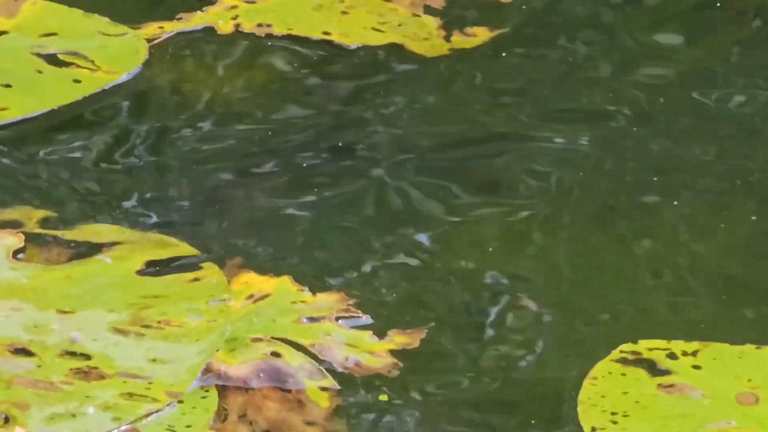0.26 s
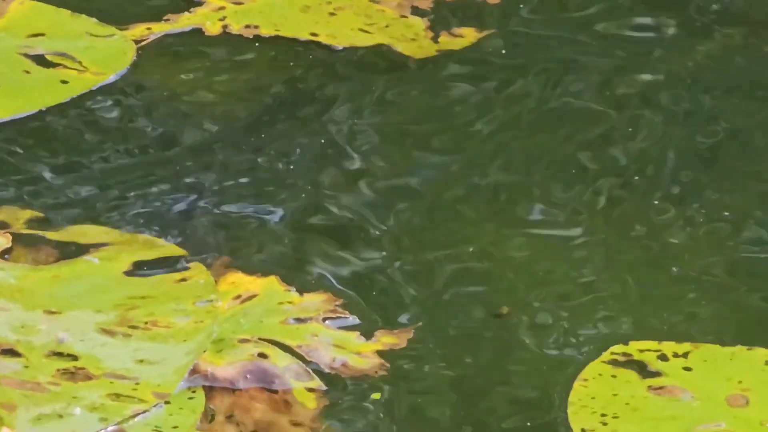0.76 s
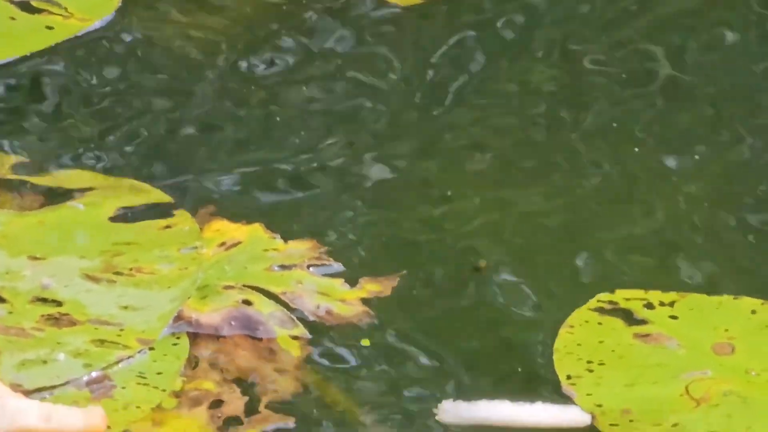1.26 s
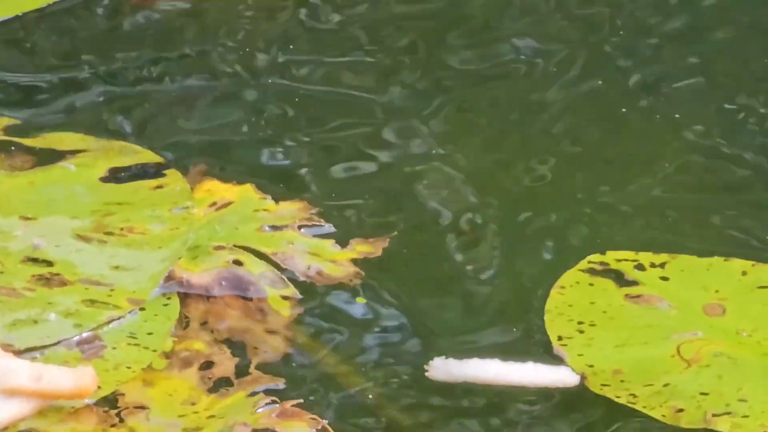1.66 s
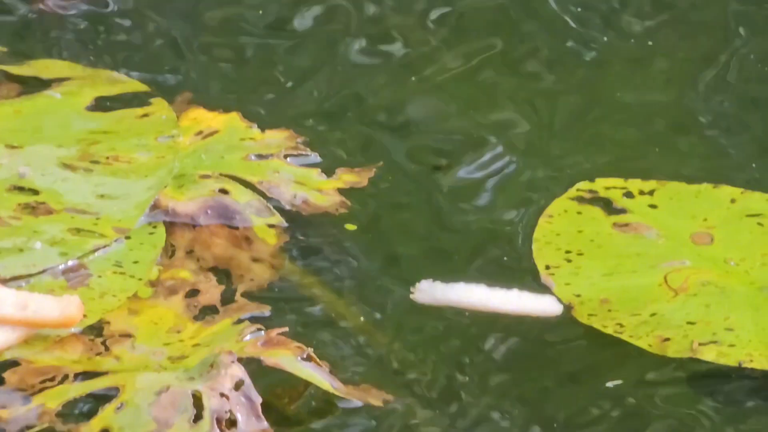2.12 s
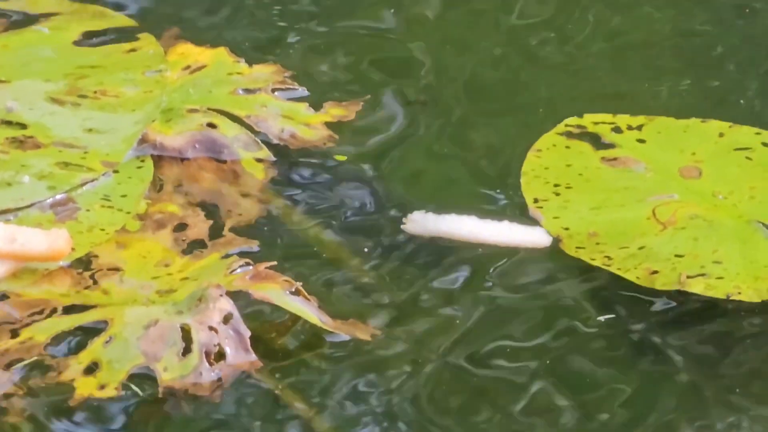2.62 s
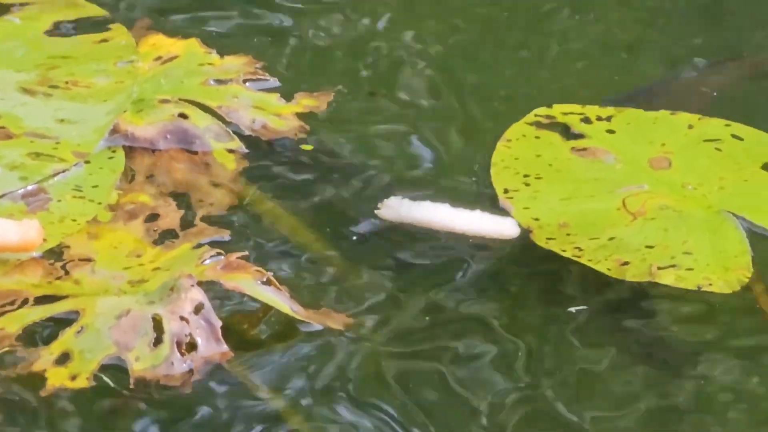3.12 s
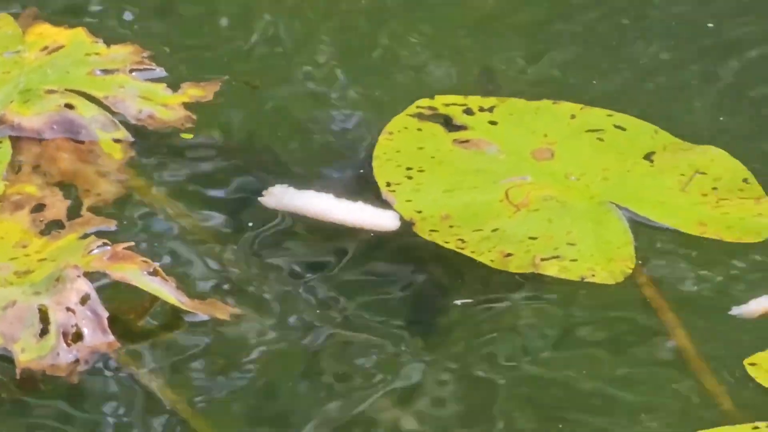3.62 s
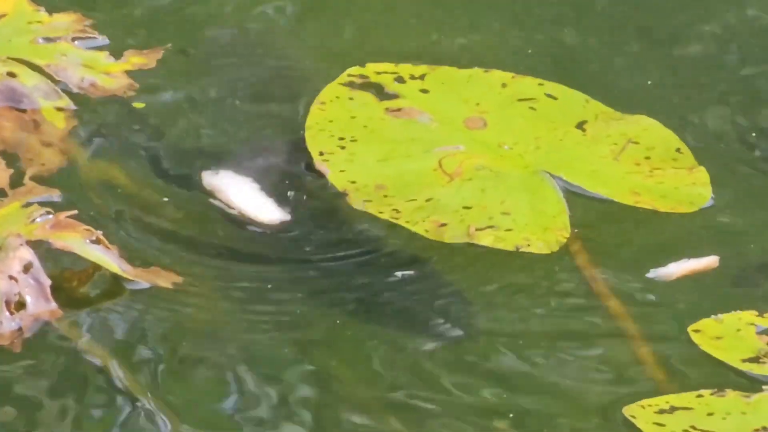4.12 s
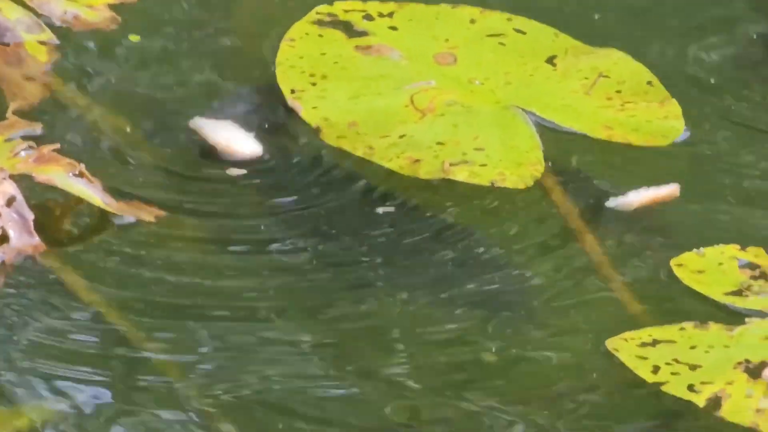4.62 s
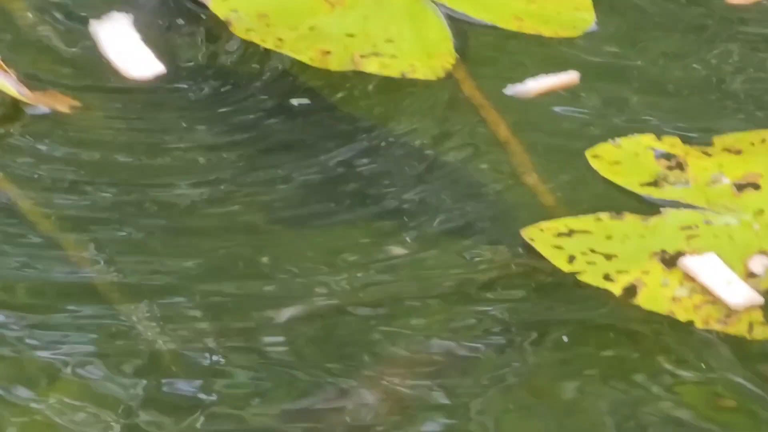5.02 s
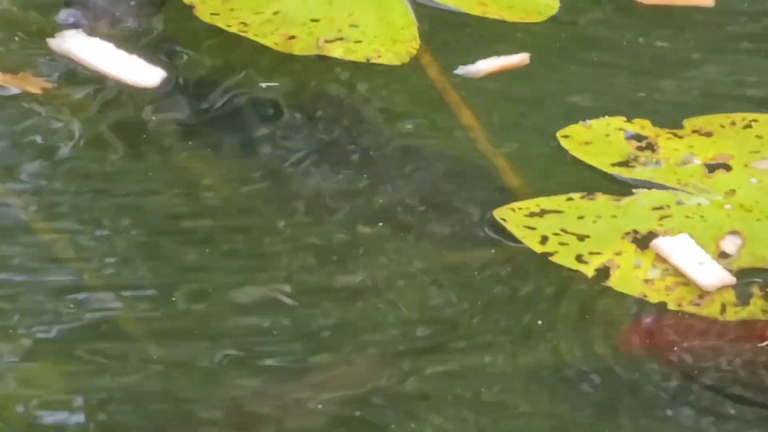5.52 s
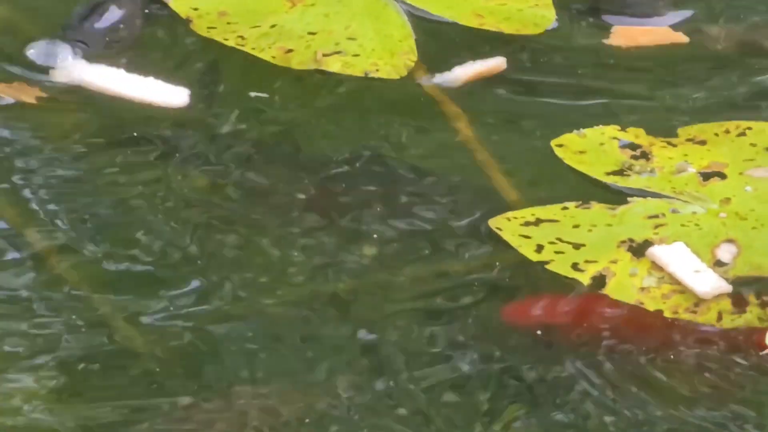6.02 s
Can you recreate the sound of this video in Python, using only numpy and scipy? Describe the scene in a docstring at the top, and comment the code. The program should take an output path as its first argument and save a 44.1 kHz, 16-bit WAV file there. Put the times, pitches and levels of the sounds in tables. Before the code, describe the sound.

Close to a pond surface, fish mouths take floating bread with tiny wet smacks, sharp pops and low plops. They start sparse and grow more frequent. A nearby bird gives short upward chirps in the middle, a small stiff knock sounds once with a quick echo, and faint hoarse twittering arrives at the end. Distant traffic rumble and soft leaf hiss lie beneath. Close stereo microphone outdoors, light garden echoes.

```python
"""A soft outdoor hiss over distant traffic rumble opens the scene: shaped noise with drifting patches.
Pond fish then suck floating bread from the surface: wet noise smacks, short sine rings (low plops and
high resonances) and small ticks. A two-voiced bird chirps upward nearby, grainy whistles twitter far
off, and a struck-mode knock sounds once. Scattered garden echoes answer them, and two microphone
ports hear the close sounds with a phase lag."""
import sys
import numpy as np
from scipy import signal
from scipy.fft import rfft, irfft, next_fast_len
from scipy.io import wavfile
from scipy.ndimage import uniform_filter1d

SR = 44100
rng = np.random.default_rng(int(sys.argv[2]) if len(sys.argv) > 2 else 0)


def digitize_waveform(pressure):
    """Quantize a signal to 16-bit integers and store it at the path in sys.argv[1].

    Rows of a 2-D input are taken as channels; values are limited to [-1, 1].
    """
    field = np.atleast_2d(pressure).T
    bounded = np.clip(field, -1, 1)
    quanta = np.round(bounded * 32767).astype(np.int16)
    wavfile.write(sys.argv[1], SR, quanta)


N = 276507  # length in samples


def amp(db):
    """Decibels to gain."""
    return 10 ** (np.asarray(db) / 20)


def evened(x):
    """Scales to rms 1."""
    return x / np.sqrt(np.mean(x ** 2) + 1e-20)


def read(points, hz):
    """Reads a curve on a log-frequency axis."""
    f, value = np.transpose(points)
    return np.interp(np.log(hz + 1), np.log(f + 1), value)


def add(mix, start_s, sound, pan_db):
    """Places a mono sound in both channels; positive pan_db leans left."""
    part = mix[:, round(start_s * SR):][:, :len(sound)]
    part += sound[:part.shape[1]] * amp([[pan_db / 2], [-pan_db / 2]])


def band(x, low_hz, high_hz):
    """Causal band-pass."""
    sos = signal.butter(2, [low_hz, high_hz], "bandpass", fs=SR, output="sos")
    return signal.sosfilt(sos, x)


def ring(hz, t60_s, rise_s, octaves=0.):
    """A decaying sine with a soft start; it glides by octaves per 20 ms during its first 30 ms."""
    t = np.arange(round(min(t60_s, .1) * SR)) / SR
    pitch_hz = hz * 2 ** (octaves * np.minimum(t, .03) / .02)
    swell = (1 - np.exp(-t / rise_s)) ** 2
    return swell * amp(-60 * t / t60_s) * np.sin(2 * np.pi * np.cumsum(pitch_hz) / SR)


def grainy(size, rough):
    """A slow random factor that breaks a whistle into grains."""
    grains = evened(uniform_filter1d(rng.standard_normal(size), 45))
    return 1 - rough + rough * grains


# how alike the two background channels are: pitch_hz [Hz], likeness [-1 to 1]
LIKENESS = [(30, 0.69), (60, 1), (130, 0.83), (290, 0.32), (640, 0.45), (1410, 0.059), (3100, -0.031),
            (6820, -0.058), (15000, 0.064)]
# left-right balance of the background: pitch_hz [Hz], left_right_db [dB]
BED_LEAN = [(60, 0.5), (110, 0.0), (200, 1), (380, 2), (700, 1), (1290, 3), (2380, 2), (4400, 3), (8120, 5),
            (15000, 2)]


def bed(spectrum, level, patchy_db, size):
    """Stereo noise built from random spectra with drifting loud patches, following a level curve."""
    frames, hz = 4 * N // size + 5, np.fft.rfftfreq(size, 1 / SR)
    a, b, c, d, patches = rng.standard_normal((frames, len(hz), 5)).T
    patches = evened(uniform_filter1d(uniform_filter1d(patches, 9, 0), 9, 1))
    same = np.clip(read(LIKENESS, hz), -1, 1)[:, None]
    lean = amp(read(BED_LEAN, hz)[:, None] / 2)
    left = a + 1j * b
    right = same * left + np.sqrt(1 - same ** 2) * (c + 1j * d)
    z = np.array([left * lean, right / lean])
    z *= amp(read(spectrum, hz)[:, None] + patchy_db * patches)
    noise = signal.istft(z, nperseg=size, noverlap=3 * size // 4)[1][:, :N]
    noise /= np.sqrt(np.mean(noise.mean(0) ** 2))  # rms 1 in the middle
    return noise * amp(np.interp(np.arange(N) / SR, *level))


# level of the rumble before it throbs: time_s [s], level_db [dB]
RUMBLE_LEVEL = [(0, -52), (.7, -47), (1.2, -50), (2.5, -50), (3.5, -49), (4.1, -51), (4.4, -48.5),
                (5.2, -46.5), (5.9, -50), (6.27, -45.5)]
# colour of the rumble: pitch_hz [Hz], relative density_db [dB per Hz]
RUMBLE_COLOUR = [(8.8, -63), (15, -27), (48, 0.5), (65, 3), (111, -4.5), (177, -24.5), (300, -26),
                 (390, -52), (660, -120)]
THROB_DB, THROB_S = 2, 0.078  # rms depth; smoothing length


def rumble():
    """Traffic rumble: low noise whose level throbs at random."""
    width = round(THROB_S * SR)
    throb = evened(uniform_filter1d(uniform_filter1d(rng.standard_normal(N), width), width))
    return bed(RUMBLE_COLOUR, np.transpose(RUMBLE_LEVEL), 0.086, size=4096) * amp(THROB_DB * throb)


# level of the far roads: time_s [s], level_db [dB]
ROAD_LEVEL = [(0.0, -58), (0.7, -58), (2.2, -60), (3.04, -59), (3.7, -60), (5.95, -60), (6.27, -57.5)]
# colour of the far roads: pitch_hz [Hz], relative density_db [dB per Hz]
ROAD_COLOUR = [(88, -33.5), (150, 9.5), (172, -12), (274, -12.5), (305, -30), (325, -14), (385, -17.5),
               (557, -15.5), (794, -10.5), (1130, -10), (1890, -14.5), (2650, -27), (6000, -39.5),
               (7800, -63), (13200, -120)]


def roads():
    """The wash of far roads: patchy noise weighted to the lower middle."""
    return bed(ROAD_COLOUR, np.transpose(ROAD_LEVEL), 2.1, size=1024)


# colour of the leaf hiss: pitch_hz [Hz], relative density_db [dB per Hz]
LEAF_COLOUR = [(2060, -14), (3500, -0.5), (4830, -8.5), (5770, -14), (6300, -3.5), (7500, -2.5), (8200, -8),
               (10400, -7.5), (11300, -3.5), (14500, -3.5), (15600, -2.5), (17000, -3.5)]
LEAF_DB = -75.5


def leaves():
    """Leaf hiss: patchy treble noise at a steady overall level."""
    return bed(LEAF_COLOUR, ([0], [LEAF_DB]), 2.1, size=512)


# level of the thin treble: time_s [s], level_db [dB]
FIZZ_LEVEL = [(0, -66.5), (.3, -77), (.85, -78), (1.0, -71), (1.15, -73.5), (1.22, -66), (1.4, -68.5),
              (1.46, -77), (1.6, -67.5), (1.8, -70), (1.9, -95)]
# colour of the thin treble: pitch_hz [Hz], relative density_db [dB]
FIZZ_TONE = [(5000, -12.5), (9000, -12.5), (12500, -11), (15700, -10), (17000, -4.5)]


def fizz():
    """Thin treble noise that comes and goes early on, in fine flickering patches."""
    return bed(FIZZ_TONE, np.transpose(FIZZ_LEVEL), 3.7, size=256)


# a puff of wind shakes the microphone: start_s [s], peak_db [dB], pitch_hz [Hz], length_s [s]
WIND_PUFF = (6.096, -35, 53, .105)


def wind_puff():
    """One low sine under a single hump, the thud of wind on a microphone."""
    out = np.zeros((2, N))
    start_s, peak_db, pitch_hz, length_s = WIND_PUFF
    t = np.arange(0, length_s, 1 / SR)
    hump = np.sin(np.pi * (t / t[-1]) ** 1.44)
    add(out, start_s, amp(peak_db) * hump * np.sin(2 * np.pi * pitch_hz * t), 0)
    return out


def background():
    """Traffic rumble, far roads, leaf hiss, treble fizz and one puff of wind."""
    return rumble() + roads() + leaves() + fizz() + wind_puff()


# how long the garden rings: pitch_hz [Hz], t60_s [s]
GARDEN_DECAY = [(500, .25), (2200, 0.63), (5000, 0.54), (9000, 0.52), (16000, 0.3)]


def garden(x):
    """Scattered echoes off banks, trees and walls build up, then each band dies at its own speed."""
    taps = np.zeros((2, SR))
    at = np.arange(40, SR - 20, 20) + rng.integers(0, 20, (2, (SR - 41) // 20))
    np.put_along_axis(taps, at, rng.choice([-1., 1.], at.shape), 1)
    taps *= amp(1.7 * evened(uniform_filter1d(rng.standard_normal(SR), 200)))  # echoes come in clumps
    taps *= 1 - 0.42 * np.exp(-np.arange(SR) / SR / 0.066)  # build-up
    hz, t, z = signal.stft(taps, SR, nperseg=256)
    decay = amp(-60 * t / read(GARDEN_DECAY, hz)[:, None])
    tail = signal.istft(z * decay, SR, nperseg=256)[1]
    return signal.fftconvolve(x, tail / np.linalg.norm(tail[0]), axes=1)[:, :N]


# far hoarse syllables: start_s [s], level_db [dB], start_hz [Hz]
SYLLABLES = [(5.783, -64, 3280), (5.8, -59.5, 4280), (5.853, -61, 3330), (5.87, -55, 4350),
             (5.916, -62, 3380), (5.935, -60, 4000), (6.015, -55, 3750), (6.087, -59, 4130),
             (6.102, -61.5, 4600), (6.166, -64, 3340), (6.192, -59.5, 4400), (6.218, -54.5, 5050),
             (6.242, -68, 4000)]
SYLLABLE_S, SYLLABLE_RISE = 0.034, 1.03  # length; each slides up by this factor


def twitter():
    """Far short notes: grainy whistles that each slide slightly upward."""
    out = np.zeros((2, N))
    for start_s, level_db, start_hz in SYLLABLES:
        hz = start_hz * np.geomspace(1, SYLLABLE_RISE, round(SYLLABLE_S * SR))
        whistle = np.sin(2 * np.pi * np.cumsum(hz) / SR)
        note = grainy(len(hz), 0.53) * signal.windows.tukey(len(hz), .6) * whistle
        add(out, start_s, amp(level_db) * note, 0)
    return out


# the blow: start_s [s], level_db [dB], left_right_db [dB]
BLOW = (4.2182, -10.5, 3.)
# what it rings with: pitch_hz [Hz], level_db [dB re the blow], t60_s [s]
BLOW_MODES = [(2060, 9, 0.0077), (2360, -7, 0.014), (4440, -26, 0.0097), (9230, 1, 0.0088)]
# a near wall answers once: later_s [s], level_db [dB re the blow]
WALL_ECHO = (.0335, -9)
# what reaches the garden: from_hz [Hz], to_hz [Hz], level_db [dB re the blow]
BLOW_CARRY = [(2100, 2570, 14.5), (4070, 5000, 6.5), (5000, 7700, 3.5), (8500, 9750, 6.5),
              (10000, 15500, 3.5)]


def knock():
    """A hard blow rings the modes of something small and stiff; returns it and its garden send."""
    start_s, level_db, pan_db = BLOW
    click = signal.unit_impulse(round(.03 * SR), round(.0018 * SR))  # delayed until the ring has swelled
    modes = np.zeros((2, len(click)))
    for hz, mode_db, t60_s in BLOW_MODES:
        add(modes, 0, amp(mode_db) * ring(hz, t60_s, 0.0022), 0)
    out, sent = np.zeros((2, 2, N))
    crack = amp(-11) * band(band(click, 3000, 16500), 3000, 16500)
    add(out, start_s, amp(level_db) * (modes[0] + crack), pan_db)
    later_s, echo_db = WALL_ECHO
    add(out, start_s + later_s, amp(level_db + echo_db) * band(modes[0], 1600, 5000), 0)
    for low_hz, high_hz, carry_db in BLOW_CARRY:
        add(sent, start_s, amp(level_db + carry_db) * band(click, low_hz, high_hz), 0)
    return out, sent


# shape of one chirp: time_s [s from its start], rough_hz [Hz, before each call's pitch factor],
# rough_db [dB], pure_hz [Hz], pure_db [dB], share [of the call's roughness]
CHIRP_SHAPE = [(0, 1504, -11, 3002, -40, 1.1), (.012, 1680, 1, 3095, -8, 1),
               (.022, 2164, -1, 3617, -8, 0.28), (0.029, 2860, -1, 4404, 1, 0.9),
               (.040, 3450, -5.5, 4330, -7, 0.41), (0.046, 3720, -7, 4320, 0, .3),
               (.054, 3570, -16, 4410, -39, .3)]
# partials of the rough voice: multiple [of rough_hz], level_db [dB]
ROUGH_PARTIALS = [(2, 2), (3, -6.5)]
# the calls: start_s [s], direct_db [dB], pitch [factor on the rough voice], roughness [factor],
# echo_db [dB sent to the garden]
CALLS = [(2.756, -48, 0.94, 1.23, -47), (2.859, -50, 0.94, 1, -51.5), (3.143, -47, .96, 0.2, -52.5),
         (3.384, -85, 0.97, .8, -62), (5.330, -58, 0.97, 0.7, -56.5)]
# leaves near the bird repeat its call: later_s [s], level_db [dB re direct]
LEAF_REPEATS = [(.0035, -4), (.0075, -10), (0.011, -7.5)]


def chirps():
    """Two voices of one throat, rough and pure, slide up together; returns calls and garden send."""
    out, sent = np.zeros((2, 2, N))
    at, *columns = np.transpose(CHIRP_SHAPE)
    t = np.arange(0, at[-1], 1 / SR)
    rough_hz, rough_db, pure_hz, pure_db, share = (np.interp(t, at, c) for c in columns)
    for start_s, direct_db, pitch, roughness, echo_db in CALLS:
        turns = np.cumsum(rough_hz * pitch) / SR
        rasp = np.clip(roughness * share, 0, 1)
        rough = np.zeros(len(t))
        for multiple, partial_db in ROUGH_PARTIALS:
            rough += amp(partial_db) * grainy(len(t), rasp) * np.sin(2 * np.pi * multiple * turns)
        # the open beak favours the middle
        rough = band(band(amp(rough_db) * rough, 4530, 8800), 2200, 12000)
        pure = np.sin(2 * np.pi * np.cumsum(pure_hz) / SR)
        pure *= amp(pure_db) * grainy(len(t), 0.29 + 0.25 * rasp)
        call = (rough + pure) * signal.windows.tukey(len(t), .15)
        add(out, start_s, amp(direct_db) * call, 0)
        for later_s, repeat_db in LEAF_REPEATS:
            add(out, start_s + later_s, amp(direct_db + repeat_db) * call, 0)
        add(sent, start_s, amp(echo_db) * call * (1.2 - share), 0)  # the steady parts carry furthest
    return out, sent


# colour of the wet mouth: pitch_hz [Hz], level_db [dB]
WET_COLOUR = [(180, -18), (300, -20.5), (567, -1.5), (1330, 2.5), (2130, 0), (2840, -9.5), (3650, -5.5),
              (4240, -7.5), (5830, -16.5), (9020, -4.5), (9810, -8.5), (11600, -2.5), (13300, -11),
              (15700, -4.5), (16500, -5.5)]
SMACK_T60_S, T60_PER_HELD = 0.016, 2.8  # a smack that holds longer also dies more slowly
SNAP_DB, SNAP_LOSS_DB_PER_S = 15, 900  # the film's snap, weaker the longer the smack holds


def smack(level_db, body_db, spray_db, held_s):
    """The film snaps, tiny ruptures hold while the lips part, then die, coloured by the wet mouth."""
    t = np.arange(8192) / SR
    clump_db = 3.5 / (1 + held_s / 0.036)  # a long smack is smoother
    clumps = np.minimum(rng.exponential(1, len(t) // 16), 4.5).repeat(16)
    ruptures = rng.standard_normal(len(t)) * amp(clump_db * clumps)
    after = np.maximum(t - held_s, 0)
    t60_s = SMACK_T60_S + T60_PER_HELD * held_s
    fine_spray = amp(-20.0 - 60 * after / 0.18)  # lingers
    shape = np.minimum(t / (0.0001 + 0.32 * held_s), 1) * (amp(-60 * after / t60_s) + fine_spray)
    snap = amp(SNAP_DB - SNAP_LOSS_DB_PER_S * held_s) * (t == 0)
    hz = np.fft.rfftfreq(len(t), 1 / SR)
    mouth = [(2200, body_db), (3300, 0), (6000, 0), (8000, spray_db)]
    log_gain = np.log(amp(np.maximum(read(WET_COLOUR, hz), -45) + read(mouth, hz)))
    # folding the cepstrum makes the colour causal (minimum phase)
    half = len(t) // 2 - 1
    cepstrum = irfft(log_gain) * np.r_[1, 2 * np.ones(half), 1, np.zeros(half)]
    burst = irfft(rfft(ruptures * shape + snap) * np.exp(rfft(cepstrum)))
    return amp(level_db) * burst / np.linalg.norm(burst) * np.linalg.norm(shape) / 2


# lips and water film part: start_s [s], level_db [dB], body_db and spray_db [dB re the middle],
# held_s [s], left_right_db [dB]
LIP_SMACKS = [(.5440, -28, -6.5, -11, 0.0012, 3), (1.3660, -39, 1.5, -3, 0.002, 2),
              (1.6480, -42, 4, -1, 0.025, 3.5), (2.1200, -44.5, 5, -10.5, 0.0072, 5),
              (2.693, -35, 3, 5, 0.00045, 0), (3.0185, -41, 0.5, -11, .004, 1),
              (3.1267, -22, -2.5, 7, 0.0017, 1.5), (3.1320, -34, 3, -1, 0.005, 4),
              (3.137, -51, -11, -5, .04, -4), (3.311, -49, 2.5, -7, 0.00075, 3),
              (3.604, -31, 0, -4.5, .003, 7), (3.6070, -32.5, 1, 2, .0005, -8),
              (3.6125, -37, 27, 3, .0007, 2), (3.9409, -29.5, -6.5, -7.5, 0.0031, 0.5),
              (3.9498, -35, -5.5, -5, 0.0035, 13.5), (3.9550, -36, -5, -6, 0.0074, -2),
              (4.6953, -42, 7.5, -15, 0.0034, 6), (5.1333, -49.5, 3.5, -12, .002, 2),
              (5.139, -39.5, 7, -15, 0.0012, 2), (5.5600, -34.5, 7, -5, .001, 0),
              (5.5690, -29.5, 2.5, -0.5, 0.0049, 6), (5.5722, -31, -4.5, -1.5, 0.0072, -6),
              (5.5830, -43, 1, -2, 0.0098, 14), (5.8951, -27.5, 5.5, 2.5, 0.0033, 2.5),
              (6.0392, -27, -10, -11, 0.0016, -3), (6.0471, -29, -3.5, -4.5, 0.0012, 8.5),
              (6.234, -27.5, -2, -2, 0.0029, 1.5), (6.2421, -33.5, 26, 8, 0.0015, 8)]


def smacks():
    """Each wet smack of lips leaving the surface, placed left or right."""
    out = np.zeros((2, N))
    for start_s, *settings, pan_db in LIP_SMACKS:
        add(out, start_s, smack(*settings), pan_db)
    return out


# left-right balance of rings and ticks: pitch_hz [Hz], left_right_db [dB]
CLOSE_LEAN = [(600, -0.5), (1400, 6.5), (2000, 10), (3300, -7), (4300, -2), (9000, 2), (15600, 7)]
# small drops and film ticks: start_s [s], level_db [dB], pitch_hz [Hz]
DROP_TICKS = [(.854, -62, 11000), (1.192, -54, 12900), (1.273, -56, 12300), (1.741, -52, 12600),
              (1.899, -58.5, 3120), (2.894, -54, 11200), (2.917, -55, 11200), (3.322, -58, 10000),
              (3.584, -57, 9000), (4.091, -57, 4380), (4.130, -54.5, 11400), (4.512, -59, 9000),
              (4.526, -52.5, 8250), (5.246, -67, 14500), (5.250, -63, 7800), (5.344, -59, 11700),
              (5.927, -49, 8100), (6.172, -54.5, 8000)]
FAINT_TICKS, FAINT_DB, FAINT_HZ = 9, -66, (9000, 14500)  # fainter ticks fall at random


def ticks():
    """Small drops and film ticks: short decaying puffs of noise in a narrow band."""
    out = np.zeros((2, N))
    faint = [(rng.random() * N / SR, FAINT_DB, rng.uniform(*FAINT_HZ)) for _ in range(FAINT_TICKS)]
    for start_s, level_db, hz in DROP_TICKS + faint:
        noise = rng.standard_normal(600) * amp(-60 * np.arange(600) / SR / 0.019)
        puff = band(noise, 0.85 * hz, min(1.14 * hz, 17000))
        add(out, start_s, amp(level_db) * puff / (2 * puff[:100].std()), read(CLOSE_LEAN, hz))
    return out


# short rings at the surface: low air-pocket plops, and high resonances of mouth or microphone
# set off by smacks: start_s [s], level_db [dB], pitch_hz [Hz at the start], glide [octaves per 20 ms]
SURFACE_RINGS = [(.5442, -31, 3440, -0.33), (.546, -44.5, 568, 0.12), (1.365, -28, 1360, 0.16),
                 (1.367, -56, 4980, 0.), (2.120, -35, 3150, -.08), (2.126, -53, 1730, -0.15),
                 (2.688, -40, 1880, -0.12), (2.694, -40, 14500, 0.), (3.0226, -23.5, 1410, -0.043),
                 (3.1272, -24, 15600, .08), (3.1275, -30, 9100, 0.), (3.134, -35.5, 617, 0.15),
                 (3.311, -47, 1470, -0.0096), (3.320, -46.5, 1865, -0.45), (3.428, -43, 640, .08),
                 (3.468, -55, 1440, .45), (3.565, -53, 2170, .3), (3.577, -45, 1260, .5),
                 (3.604, -36, 620, 0.23), (3.605, -28.5, 1970, 0.38), (3.9412, -31.5, 1670, 0.13),
                 (3.9500, -26, 11830, -0.087), (3.9545, -26, 4170, .07), (3.957, -35.5, 572, 0.01),
                 (4.195, -28, 1308, 0.77), (4.698, -39, 2000, -.04), (5.133, -36.5, 4150, .03),
                 (5.138, -44, 1460, -0.043), (5.5614, -26, 1480, 0.032), (5.5720, -24, 11600, .08),
                 (5.587, -38.5, 596, -.15), (5.897, -29, 1256, .1), (5.8975, -18, 15600, .08),
                 (6.0400, -31, 3520, 0.033), (6.047, -39, 718, -0.15), (6.0480, -21.5, 9000, 0.),
                 (6.196, -47, 1360, 0.23), (6.2355, -20.5, 8640, 0.052), (6.2355, -30.5, 580, 0.042),
                 (6.246, -32, 730, -0.032)]
RING_T60_S, T60_FLOOR_S = 0.019, 0.0064  # scaled part at 1 kHz and -36 dB; fixed part
T60_PER_GLIDE = 4.7  # longer per squared glide
SHORTER_PER_DB = 0.74  # dB of the scaled ring time lost per dB of level
RING_RISE_S, RISE_PER_GLIDE = 0.00041, 2.8  # a gliding ring swells more slowly


def surface_rings():
    """Plops and resonances as decaying sines: they last longer when lower, softer or gliding."""
    out = np.zeros((2, N))
    for start_s, level_db, hz, glide in SURFACE_RINGS:
        scaled_s = RING_T60_S * 1000 / hz * amp(-SHORTER_PER_DB * (level_db + 36))
        t60_s = (T60_FLOOR_S + scaled_s) * (1 + T60_PER_GLIDE * glide ** 2)
        rise_s = RING_RISE_S * (1 + RISE_PER_GLIDE * glide ** 2)
        add(out, start_s, amp(level_db) * ring(hz, t60_s, rise_s, glide), read(CLOSE_LEAN, hz))
    return out


def fish():
    """Smacks, short rings and ticks at the surface."""
    return smacks() + surface_rings() + ticks()


# phase between the ports: pitch_hz [Hz], left_lead [radians]
LEFT_LEAD = [(0, 0.5), (2200, 0.5), (2900, -2.5), (3700, 1.3), (7000, -2), (9200, -1.8), (12000, -1.25),
             (16500, -2)]


def ports(x):
    """The two ports hear close sounds with a phase lag that changes with pitch."""
    size = next_fast_len(N)
    half_lead = np.interp(np.fft.rfftfreq(size, 1 / SR), *np.transpose(LEFT_LEAD)) / 2
    return irfft(rfft(x, size) * np.exp(1j * np.array([half_lead, -half_lead])), size)[:, :N]


def scene():
    """All sources with their share of echo."""
    near, far = fish(), twitter()
    blow, blow_sent = knock()
    bird, bird_sent = chirps()
    echoes = garden(amp(-23) * near + blow_sent + amp(-4) * far + bird_sent)
    return ports(near + blow + bird) + far + echoes + background()


TOP_HZ, TOP_DB = 15900, -22  # the microphone drops off sharply above this pitch, by this much
EDGE_HZ = 16900  # the recorder's band limit


def record(dry):
    """The microphone's treble drop and the recorder's band limit."""
    below_top, below_edge = (signal.firwin(511, hz, window=("kaiser", 9), fs=SR)
                             for hz in (TOP_HZ, EDGE_HZ))
    response = (1 - amp(TOP_DB)) * below_top + amp(TOP_DB) * below_edge
    return signal.oaconvolve(dry, response[None], "same")


dry = scene()
out = record(dry)
digitize_waveform(out)
```